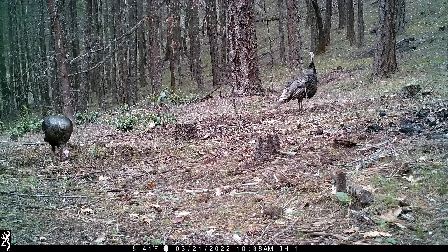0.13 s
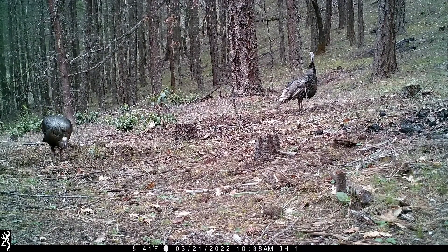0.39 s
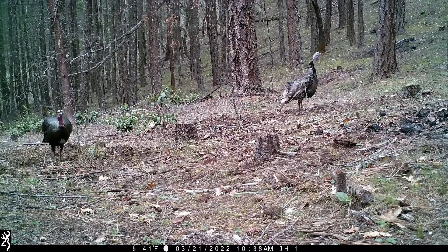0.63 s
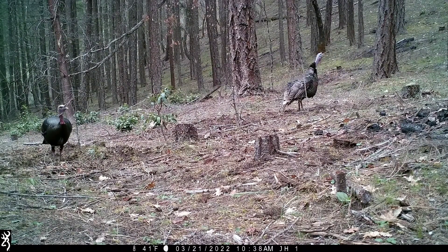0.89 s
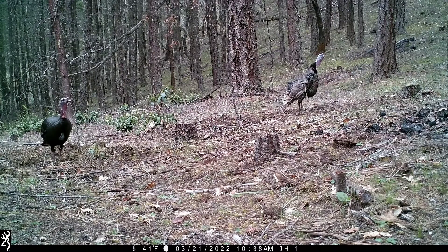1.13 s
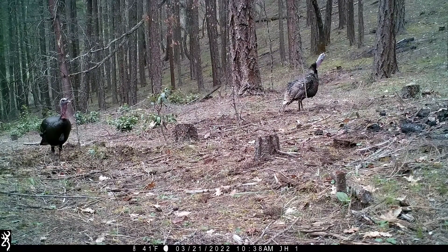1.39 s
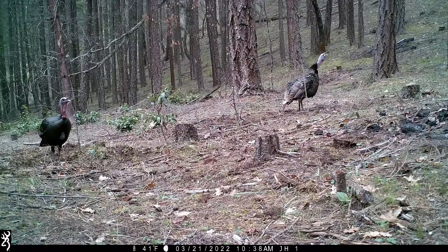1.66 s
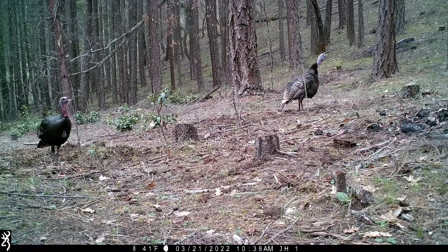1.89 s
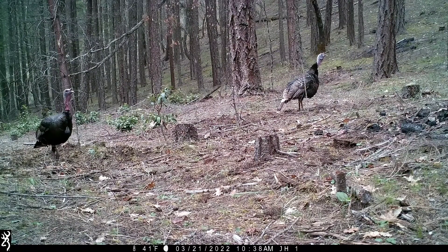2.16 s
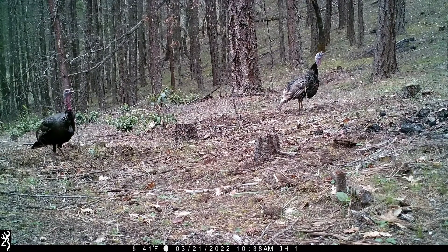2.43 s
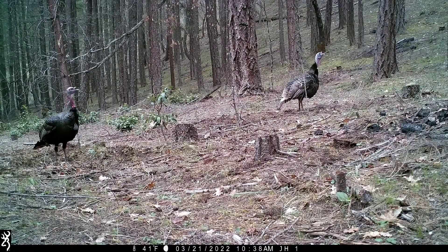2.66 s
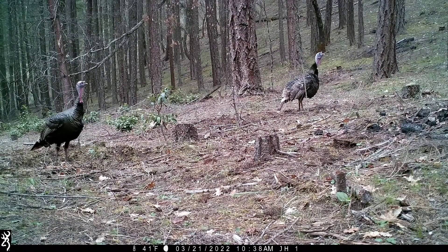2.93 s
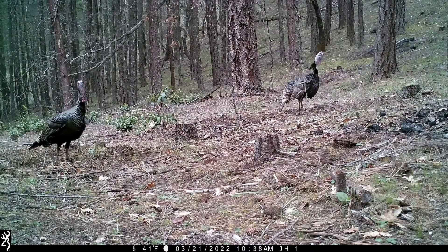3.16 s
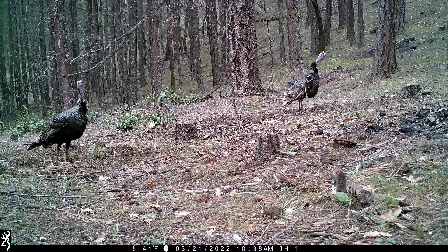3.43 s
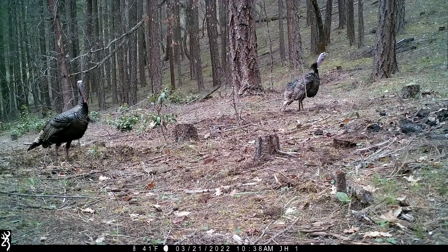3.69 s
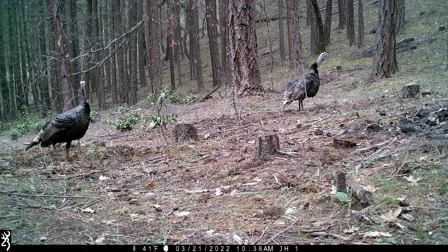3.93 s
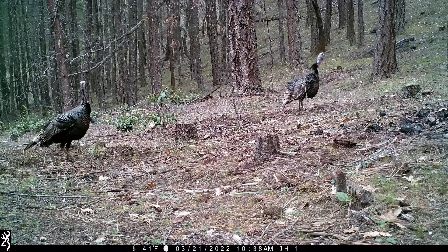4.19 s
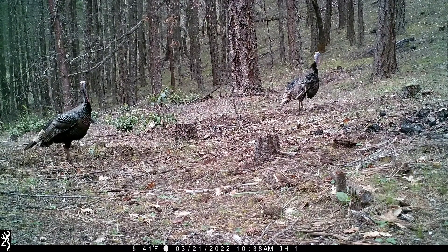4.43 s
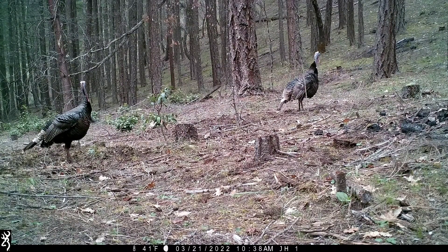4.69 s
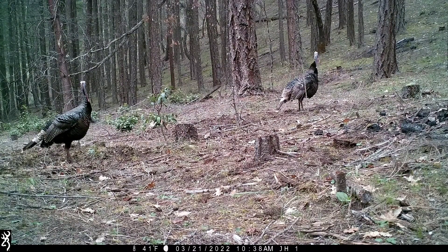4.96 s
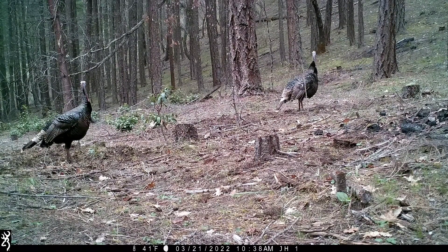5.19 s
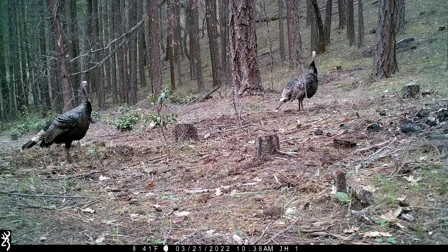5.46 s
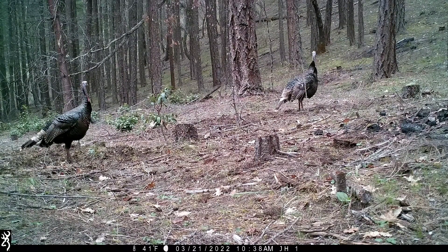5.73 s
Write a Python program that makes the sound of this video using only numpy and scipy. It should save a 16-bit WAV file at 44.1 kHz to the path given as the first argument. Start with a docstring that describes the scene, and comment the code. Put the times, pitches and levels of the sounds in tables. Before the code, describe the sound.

Two loud, rattling turkey gobbles in an echoing pine wood, with a more distant raven-like bird croaking in slow clicking bursts around them.

```python
"""Wild turkeys gobble twice near a small microphone in an open pine wood; further off a raven-like bird croaks four times.
A gobble is a fast run of hoots, falling yaps and rasps through one throat, over a low rumble of the chest.
A croak is a slowing train of clicks that ring the throat; the trunks return a long diffuse tail to both birds.
The microphone rounds the loudest peaks and adds its own hiss."""
import sys
import numpy as np
from scipy import signal
from scipy.fft import rfft, irfft
from scipy.io import wavfile
from scipy.ndimage import uniform_filter1d

SR = 44100
rng = np.random.default_rng(int(sys.argv[2]) if len(sys.argv) > 2 else 0)


def voltage_ratio(level):
    """Linear amplitude factor for a level in decibels (scalar or array-like)."""
    return 10 ** (np.asarray(level, float) / 20)


def wav_record(signal):
    """Record a signal, one row per channel, as 16-bit PCM in the file named by sys.argv[1]."""
    frames = np.transpose(np.atleast_2d(signal))
    bounded = np.clip(frames, -1, 1)
    # unit amplitude maps onto the largest positive 16-bit level
    quanta = np.round(bounded * 32767).astype(np.int16)
    wavfile.write(sys.argv[1], SR, quanta)


N = 257544
T = np.arange(N) / SR

# Levels of the birds are those ahead of the wood's echoes and the microphone.
# Self-noise of the microphone: (frequency [Hz], relative density [dB per Hz])
HISS_SPECTRUM = [(12, -30), (20, 1), (98, -2.5), (266, -5), (705, -8), (1540, -11), (1870, -12.5),
                 (2270, -13.5), (4950, -16), (15500, -19.5)]
# Croaks, pulses slowing evenly: (first pulse [s], first gap [s], last gap [s], gaps [count], level [dB])
CROAKS = [(.366, .0095, .0242, 7, -15), (1.327, .0135, .0245, 8, -16), (2.24, .0125, .0255, 10, -16.5),
          (3.51, .017, .0245, 7, -14.5)]
# Lone pulses before a croak: (time [s], level [dB])
LEAD_CLICKS = [(0.322, -29), (0.341, -38), (0.353, -21.5), (2.22, -30.5)]
# Throat modes of the croaking bird: (frequency [Hz], level [dB], swell time at a 24 ms gap [s])
CROAK_MODES = [(580, -33, 0.019), (1181.4, 1.5, 0.021), (1424, -1, 0.002), (1707, -5.5, 0.0061),
               (2805, -4, 0.0012)]
# Decay of the wood's tail before any stretch: (frequency [Hz], time to fall 60 dB [s])
WOOD_T60 = [(300, 0.46), (650, 2.15), (1150, 1.526), (2000, 1.21), (5500, 0.88), (12000, 0.95)]
# Low rumble of the turkey's chest: (frequency [Hz], relative density [dB per Hz])
CHEST_SPECTRUM = [(30, -23), (62, -1), (120, -1.5), (160, -16), (210, -3.5), (270, -22), (500, -38.5)]
# Broad response of the turkey's throat: (frequency [Hz], gain [dB])
THROAT = [(330, -20), (470, -15.5), (640, -3), (790, -15.5), (980, 2), (1170, -0.5), (1480, -1), (1750, -4),
          (1970, -8.5), (2560, -5.5), (3300, -16), (4200, -23), (5260, -15.5), (7000, -32.5),
          (15000, -52.5)]
# Narrow resonances on top of it: (frequency [Hz], half width [Hz], gain [dB])
WINDPIPE = [(597, 43, 3), (1756, 55, 10), (3400, 41, 9.5), (5164, 144, 6.5)]
# Hoarse notes, the voice breaking up: (time [s], length [s], level [dB], tilt [dB per octave])
RASPS = [(0.655, 0.024, -17.5, -13), (0.698, 0.032, -19.5, -10.5), (1.201, 0.023, -20.5, -2),
         (1.285, 0.051, -18.5, 2), (1.484, 0.038, -20.5, 0), (1.681, 0.036, -20, -3),
         (3.219, 0.037, -16, -4), (3.27, 0.033, -14.5, 14.5), (3.359, 0.03, -20.5, 5),
         (3.602, 0.02, -16.5, 15), (3.668, 0.038, -17.5, 18.5), (3.784, 0.026, -17.5, 14),
         (3.859, 0.021, -21, 3), (3.986, 0.011, -28, 6), (4.059, 0.06, -20, -0.5), (4.125, 0.017, -26, 1.5)]
# The loud cry that opens a gobble, a yap that only sags:
# (time [s], length [s], pitch it falls towards [Hz], level [dB], odd harmonics of half the pitch [dB])
CRIES = [(0.668, 0.027, 1115, -9.5, -19), (3.237, 0.024, 1049, -11, -8.5)]
# Arched voiced notes: (time [s], length [s], top pitch [Hz], level [dB], tilt at the top [dB per octave])
HOOTS = [(0.713, 0.07, 656, -18.5, -1), (0.871, .1, 666.3, -15, -1), (1.104, 0.051, 645, -16.5, -1.5),
         (1.309, 0.036, 659, -18.5, -1), (1.392, 0.014, 582, -17, 1), (1.504, 0.036, 651, -18, -1.5),
         (1.695, 0.044, 626.4, -21.5, -3), (3.289, 0.061, 683, -20, 0), (3.382, 0.017, 580, -19, -2),
         (3.448, .096, 714.4, -14, 0.5), (3.62, .023, 590, -16, 1.5), (3.703, 0.017, 580, -15, 0.5),
         (3.872, 0.044, 666, -17.5, -0.5), (3.967, .018, 562.5, -15.5, 2.5), (4.14, 0.023, 576, -25, -9)]
# Falling notes an octave up, every second pulse differing:
# (time [s], length [s], pitch it falls towards [Hz], level [dB], odd harmonics of half the pitch [dB])
YAPS = [(0.795, 0.046, 1073, -19, -7.5), (0.843, 0.046, 1118, -11.5, -12.5), (0.991, 0.041, 1059, -17, -5),
        (1.028, 0.037, 1128, -11, 0), (1.18, 0.035, 1039, -16, 3.5), (1.222, 0.027, 1045, -15, -16),
        (1.369, 0.027, 994, -19, -13), (1.411, 0.028, 1080, -22.5, -4), (1.57, 0.033, 996, -16.5, -25.5),
        (1.605, 0.011, 1050, -33.5, -22), (1.767, 0.034, 1457, -29, -8), (3.407, 0.044, 1105, -10.5, -8),
        (3.572, 0.027, 1065, -15, -5.5), (3.753, 0.035, 989, -16, -11), (3.799, .026, 956, -21, -31),
        (3.944, 0.033, 1000, -18.5, -9)]

FLAP_HZ = 207.3  # a slower flap that beats against the voice
RASP_HZ = 573.6
HOOT_START_HZ, HOOT_END_HZ = 590, 469.3  # shared by every hoot
# Falling notes: pitch at the start, time of the fall, level change over the note, tilt per octave once landed
CRY_START_HZ, CRY_SAG_S, CRY_SWELL_DB, CRY_TILT_DB = 1329, 0.018, 0.5, -8.5
YAP_START_HZ, YAP_PLUNGE_S, YAP_FADE_DB, YAP_TILT_DB = 1760.6, 0.011, -8.5, -4


def level(x, db):
    """Scale to an rms level."""
    return x * voltage_ratio(db) / np.sqrt(np.mean(x ** 2))


def colour(points, size):
    """Gain at the bins of an FFT, from (frequency [Hz], level [dB]) points on a log axis."""
    hz, db = np.transpose(points)
    bins_hz = np.fft.rfftfreq(size, 1 / SR)
    return voltage_ratio(np.interp(np.log(bins_hz + 1), np.log(hz), db))


def coloured_noise(points):
    """Steady random noise with the given spectrum."""
    return irfft(rfft(rng.standard_normal(N)) * colour(points, N), N)


def band(x, lo_hz, hi_hz):
    """Band-pass."""
    return signal.sosfilt(signal.butter(2, [lo_hz, hi_hz], "band", fs=SR, output="sos"), x)


def add(out, s, x):
    """Mix x into out from time s."""
    i = int(s * SR)
    out[i:i + len(x)] += x


def slow(noise, size):
    """Smoothed noise of spread 1."""
    return uniform_filter1d(noise, size=size, axis=-1) * np.sqrt(size)


def ramp(u, attack, release):
    """Level through a note, u from 0 to 1."""
    return np.clip(np.minimum(u / attack, (1 - u) / release), 0, 1)


def microphone_hiss():
    """Steady self-noise, densest in the lowest bass and falling towards the treble."""
    return level(coloured_noise(HISS_SPECTRUM), -51)


def croak_pulse(length, hold):
    """A sharp click; the throat modes, a little different each time, swell after it until the next closure."""
    t = np.arange(int(length * SR)) / SR
    hz, db, swell = np.transpose(CROAK_MODES)[:, :, None]
    detune, uneven_db = rng.standard_normal((2, len(hz), 1))
    rise = t / (hold * swell)
    swelling = voltage_ratio(db + uneven_db) * rise * np.exp(1 - rise)
    ring = swelling * np.sin(2 * np.pi * hz * (1 + 0.018 * detune) * t)
    air = rng.standard_normal(len(t))
    burst = band(band(air * np.exp(-t / 0.00792), 3260, 6100), 2524, 6300)
    fizz = band(air * np.exp(-t / 0.024), 4770, 10200)
    click = level(burst, -14.5) + level(fizz, -30)
    choke = np.clip((length - t) / 0.00307, 0, 1)
    return (ring.sum(axis=0) + click) * choke


def croaks():
    """Pulse trains that swell, slow down and stop, with lone pulses ahead of some."""
    out = np.zeros(N)
    for s, db in LEAD_CLICKS:
        add(out, s, voltage_ratio(db) * croak_pulse(0.014, 0.23))
    for s, first_gap, last_gap, count, db in CROAKS:
        gaps = np.linspace(first_gap, last_gap, count)
        times = s + np.cumsum(np.r_[0, gaps])
        # faint at first, and the last pulse weaker
        swell_db = -7 * np.clip(1 - (times - s) / 0.059, 0, 1) - 4 * (times == times[-1])
        scatter_db = 0.8 * rng.standard_normal(count + 1)
        lengths = np.r_[gaps, 0.012]
        for t, length, size_db in zip(times, lengths, swell_db + scatter_db):
            add(out, t, voltage_ratio(db + size_db) * croak_pulse(length, length / 0.024))
    return out


def wood(x, early_db, late_db, early_s, stretch):
    """Scattering from trunks: near echoes and a tail that loses its treble, its decay times stretched by a factor."""
    t = T[:int(2.5 * SR)]
    hz, t60 = np.transpose(WOOD_T60)
    early_noise, late_noise = rng.standard_normal((2, len(t)))
    late = np.zeros(len(t))
    for lo in 150 * 2 ** (np.arange(13) / 2):  # half-octave bands
        band_t60 = stretch * np.interp(np.log(lo * 2 ** (1 / 4)), np.log(hz), t60)
        late += band(late_noise, lo, np.sqrt(2) * lo) * voltage_ratio(-60 * t / band_t60)
    late *= np.clip(t / 0.027, 0, 1)
    early = early_noise * np.exp(-t / early_s) * np.clip(t / 0.0079, 0, 1)
    echo = voltage_ratio(late_db) * late / np.linalg.norm(late) + voltage_ratio(early_db) * early / np.linalg.norm(early)
    return x + signal.fftconvolve(x, echo)[:N]


def chest_rumble(effort):
    """Low noise from the chest that follows the smoothed effort of the notes."""
    return level(coloured_noise(CHEST_SPECTRUM), -36.5) * uniform_filter1d(effort, size=1500)


def throat_response(size=2048):
    """Minimum-phase response of throat and windpipe, by folding the cepstrum of their spectrum."""
    f = np.fft.rfftfreq(size, 1 / SR)
    peaks_db = sum(db / (1 + ((f - hz) / width) ** 2) for hz, width, db in WINDPIPE)
    cepstrum = irfft(np.log(colour(THROAT, size) * voltage_ratio(peaks_db)))
    cepstrum[1:size // 2] *= 2
    cepstrum[size // 2 + 1:] = 0
    return irfft(np.exp(rfft(cepstrum)))[:size // 2]


def voice(hz, tilt_db, half_db, root_db, rough, shape, throat):
    """One note: uneven harmonics of a wavering pitch and air noise puffed once a cycle, through the throat."""
    waver, hiss = rng.standard_normal((2, len(hz)))
    chance = rng.standard_normal((22, len(hz)))
    phase = 2 * np.pi * np.cumsum(hz * (1 + 0.1334 * rough * slow(waver, size=60))) / SR
    k = np.arange(1, 23)[:, None]
    # every harmonic has its own phase and comes and goes, the upper ones more
    patchy_db = (6 * rough + 1.69 * np.log2(k)) * slow(chance, size=400)
    gains = voltage_ratio(tilt_db * np.log2(k) + half_db * (k % 2) + root_db * (k == 1) + patchy_db)
    tone = np.sum(gains * np.cos(k * phase + 2 * chance[:, :1]), axis=0)
    # the steeper the tilt of the tone, the duller the air
    dull = np.clip(0.6 - 0.021 * np.mean(tilt_db), 0, 0.95)
    puffs = signal.lfilter([1], [1, -dull], hiss) * (1 + 0.22 * np.cos(phase))
    source = (1 - rough) * level(tone, 0) + 0.8 * rough * level(puffs, 0)
    flap_depth = np.clip(0.7 * rough - 0.1, 0, 1)
    flap = 1 + flap_depth * np.cos(2 * np.pi * FLAP_HZ * T[:len(hz)] + 2 * hiss[0])
    return signal.fftconvolve(source * flap * shape, throat)


def rasps(out, effort, throat):
    """Hoarse notes of sagging pitch, rough enough for the flap to beat against the voice."""
    for s, length, db, tilt_db in RASPS:
        u = np.linspace(0, 1, int(length * SR))
        hz = RASP_HZ * (1.04 - 0.0825 * u)
        note = voice(hz, tilt_db, 4.5, -35.0, 0.48, ramp(u, 0.31, 0.11), throat)
        add(out, s, level(note, db))
        add(effort, s, 1.64 * np.hanning(len(u)))


def falling_notes(out, effort, throat, rows, start_hz, fall_s, change_db, tilt_db):
    """Cries or yaps: the pitch falls to its landing; the voice cycles at half of it, so pulses alternate."""
    for s, length, end_hz, db, half_db in rows:
        u = np.linspace(0, 1, int(length * SR))
        glide = np.exp(-(u * length / fall_s) ** 2)
        hz = end_hz + (start_hz - end_hz) * glide
        # thin and faint while the pitch is high, full once it lands
        shape = ramp(u, 0.029, 0.19) * voltage_ratio(-24 * (hz / end_hz - 1) + change_db * u)
        note = voice(hz / 2, tilt_db - 3 * glide, half_db, -13.5, 0.21, shape, throat)
        add(out, s, level(note, db))
        add(effort, s, 1.36 * np.hanning(len(u)))


def hoots(out, effort, throat):
    """Clear notes whose pitch arches up and drops away, brightest about the top."""
    for s, length, top_hz, db, bright_db in HOOTS:
        u = np.linspace(0, 1, int(length * SR))
        rise = np.clip(1 - u / 0.55, 0, 1) ** 1.3
        fall = np.clip((u - 0.55) / 0.45, 0, 1) ** 1.4
        hz = top_hz + (HOOT_START_HZ - top_hz) * rise + (HOOT_END_HZ - top_hz) * fall
        tilt_db = bright_db - 10 * (u - 0.55) ** 2 - 3.9 * fall
        # as the pitch drops the fundamental takes over
        root_db = 11 * fall - 5
        shape = ramp(u, 0.093, 0.045) * voltage_ratio(3.4 * fall)
        note = voice(hz, tilt_db, 0, root_db, 0.11, shape, throat)
        add(out, s, level(note, db))
        add(effort, s, 0.86 * np.hanning(len(u)))


def gobbles():
    """All notes of both gobbles through one throat, and the rumble of the chest beneath them."""
    out, effort, throat = np.zeros(N), np.zeros(N), throat_response()
    rasps(out, effort, throat)
    falling_notes(out, effort, throat, CRIES, CRY_START_HZ, CRY_SAG_S, CRY_SWELL_DB, CRY_TILT_DB)
    hoots(out, effort, throat)
    falling_notes(out, effort, throat, YAPS, YAP_START_HZ, YAP_PLUNGE_S, YAP_FADE_DB, YAP_TILT_DB)
    return out, chest_rumble(effort)


def scene():
    """Near turkeys, drier; the far croaks, wetter; the chest rumble without echo."""
    far = wood(croaks(), early_db=-4.5, late_db=-7.5, early_s=0.045, stretch=0.95)
    notes, chest = gobbles()
    near = wood(notes, early_db=-10.0, late_db=-16.5, early_s=0.029, stretch=1.0)
    return (near + chest + far)[None]


def roll_off(x):
    """The treble ends steeply here."""
    return signal.sosfilt(signal.butter(12, 15690, fs=SR, output="sos"), x)


def record(dry):
    """The small microphone's preamplifier rounds the loudest peaks and hisses."""
    rounded = np.tanh(0.78 * dry) / 0.96
    mix = rounded + microphone_hiss()
    return roll_off(mix)


dry = scene()
out = record(dry)
wav_record(out)
```